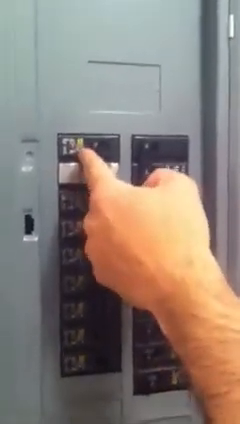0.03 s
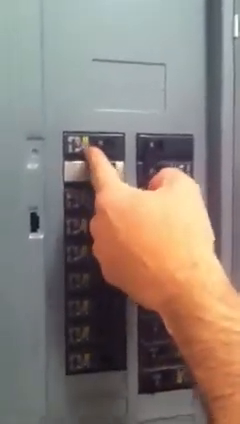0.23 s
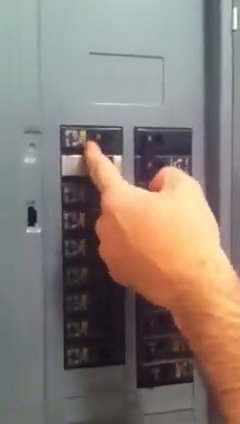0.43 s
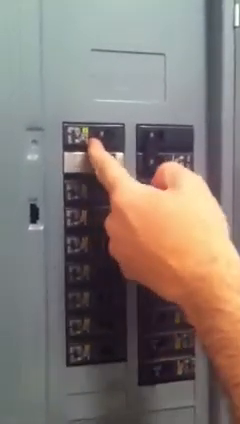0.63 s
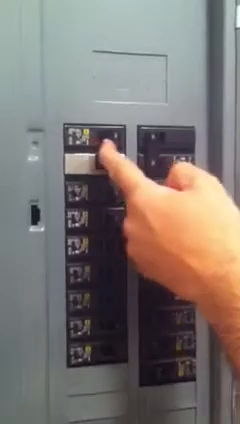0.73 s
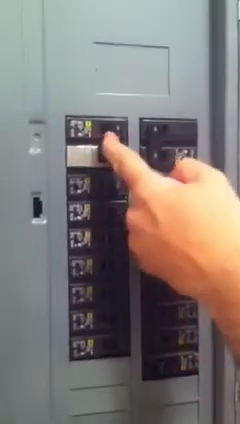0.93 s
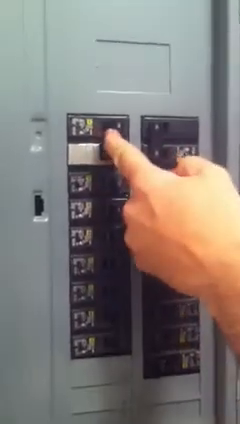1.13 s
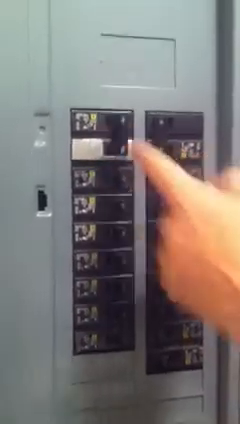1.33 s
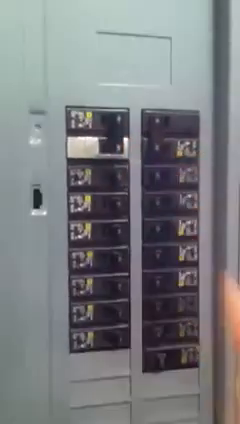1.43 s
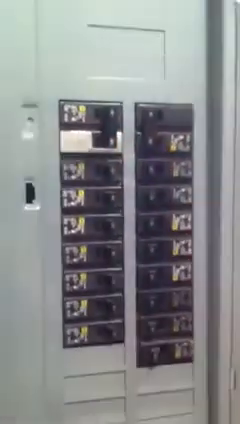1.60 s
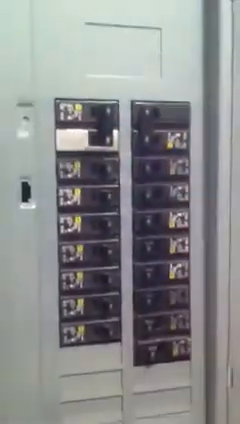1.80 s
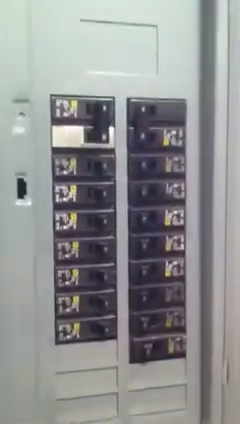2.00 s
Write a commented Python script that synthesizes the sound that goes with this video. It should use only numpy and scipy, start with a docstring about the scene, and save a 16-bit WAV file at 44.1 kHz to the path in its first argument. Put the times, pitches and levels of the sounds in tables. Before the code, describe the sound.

A circuit breaker snaps back on, close up in a small hard room. The plastic handle ticks faintly around 0.6 seconds, then one loud, bright snap at 0.8 seconds rings the steel cabinet with a short boom and echo, fading within half a second. The finger releases with a soft tick and bump at 1.3 seconds, and the arm rustles faintly away until 2 seconds. A faint low hum runs throughout.

```python
"""In a small hard room, close to a steel home panel, a tripped circuit breaker is pushed back on.
The handle ticks under the finger, then a spring throws the contacts shut. Their few impacts within
10 ms are heard as one snap that rings the mechanism, booms the cabinet and echoes in the room.
The finger lets go with a tick and the arm rustles away. A low hum runs throughout."""
import sys
import numpy as np
from scipy import signal
from scipy.fft import rfft, irfft, next_fast_len
from scipy.io import wavfile
from scipy.ndimage import map_coordinates

SR = 44100
rng = np.random.default_rng(int(sys.argv[2]) if len(sys.argv) > 2 else 0)


def generate_wav(signal):
    """Clip the signal to [-1, 1] and save it as 16-bit WAV at the path in sys.argv[1]."""
    frames = np.transpose(np.atleast_2d(signal))
    scaled = np.clip(frames, -1, 1) * 32767
    pcm = np.round(scaled).astype(np.int16)
    wavfile.write(sys.argv[1], SR, pcm)


N = 90493
T = np.arange(N) / SR
SHARP_RISE_S = .0003
ECHO_START_S, ECHO_RISE_S, SWELL_S = .774, .0032, .0091


def amp(db):
    """Turn decibels into a gain."""
    return 10 ** (np.asarray(db) / 20)


def unit(x):
    """Scale a sound to an average (rms) level of 1."""
    return x / np.sqrt(np.mean(x ** 2) + 1e-20)


def along(points, hz):
    """Read between a table's rows on a log pitch scale."""
    pitches, values = np.transpose(points)
    return np.interp(np.log(hz + 1), np.log(pitches + 1), values)


def filtered(x, response):
    """Turn each frequency up or down by response(hz)."""
    size = next_fast_len(N + SR // 2)
    return irfft(rfft(x, size) * response(np.fft.rfftfreq(size, 1 / SR)), size)[:N]


def noise(colour):
    """Noise shaped by a table of pitches and relative levels."""
    return unit(filtered(rng.standard_normal(N), lambda hz: amp(along(colour, hz))))


def band(centre_hz, octaves):
    """Noise that is strongest around one pitch."""
    white = rng.standard_normal(N)
    return unit(filtered(white, lambda hz: np.exp(-.5 * (np.log2((hz + 1) / centre_hz) / octaves) ** 2)))


def strike(start_s, rise_s, fade_s):
    """A loudness curve that rises, then dies away. Every fade_s is the time to drop 60 dB."""
    age = np.maximum(T - start_s, 0)
    return (1 - np.exp(-age / rise_s)) * amp(-60 * age / fade_s)


def ring(tones, start_s, rise_s):
    """The fading tones of a struck object, each at a slightly random level."""
    return sum(amp(db + rng.normal()) * strike(start_s, rise_s, fade_s)
               * np.sin(2 * np.pi * (hz * T + rng.random())) for hz, db, fade_s in tones)


def wobble(rate):
    """A smooth random curve through rate points a second."""
    return map_coordinates(rng.standard_normal(256), [T * rate], mode="wrap")


# Tone of the room's air: pitch_hz, level_db
AIR_COLOUR = [(15, -68), (25, -39.5), (86, -28.5), (101, -19.5), (140, -7.5), (173, -6.5), (188, -5),
              (227, 3.5), (267, -11), (368, -6.5), (410, -17), (567, -16), (722, -17.5), (1170, -24),
              (1300, -18.5), (1900, -25), (15500, -31)]
def room_air():
    """A steady low rush with a faint hiss."""
    return amp(-63.5) * noise(AIR_COLOUR)


# Tones of the hum: pitch_hz, level_db
HUM_TONES = [(120, -80.5), (150.7, -76.5), (200, -68.5), (231, -69.5), (381, -76.5)]
def hum():
    """Low tones that waver in loudness and pitch."""
    tones = 0
    for hz, db in HUM_TONES:
        waver = 1 + .45 * (wobble(rate=11) + 1j * wobble(rate=5.9))
        tones += amp(db) * np.real(waver * np.exp(2j * np.pi * (hz * T + rng.random())))
    return tones


# Loudness of the rustle: time_s, level_db
RUSTLE_LEVELS = [(0, -72), (.12, -68), (.36, -68), (.5, -71), (.75, -71), (1.1, -83), (1.27, -80),
                 (1.4, -74), (1.62, -69.5), (1.76, -84), (1.93, -69), (2.05, -78)]
# Tone of the rustle: pitch_hz, level_db
RUSTLE_TONE = [(100, -7), (400, 7.5), (1400, 0.5), (2600, -4.5), (6000, -8.5), (15000, -13)]
def arm_rustle():
    """The arm rustles faintly as it moves."""
    return amp(np.interp(T, *np.transpose(RUSTLE_LEVELS))) * noise(RUSTLE_TONE)


# Loudness of the brushing: time_s, level_db
BRUSH_LEVELS = [(1.75, -94), (1.86, -73.5), (1.94, -74), (2.05, -80.5)]
def arm_brush():
    """A light, high brushing as the arm draws back."""
    return amp(np.interp(T, *np.transpose(BRUSH_LEVELS))) * band(centre_hz=5500, octaves=.8)


# Soft bumps: start_s, level_db, pitch_hz, width_octaves, fade_s
HAND_BUMPS = [(1.315, -57, 219, 0.93, 0.45), (1.314, -59.5, 690, 0.88, 0.19), (1.833, -58, 900, 1.12, 0.2)]
def hand_bumps():
    """The hand bumps softly as it leaves."""
    return sum(amp(db) * band(hz, octaves) * strike(start_s, rise_s=.011, fade_s=fade_s)
               for start_s, db, hz, octaves, fade_s in HAND_BUMPS)


# How long the room holds each pitch: pitch_hz, fade_s
ROOM_FADES = [(150, .4), (600, .32), (2000, 0.22), (5000, .27), (9000, 0.24), (14000, 0.14)]
def room_fade(x, start_s):
    """From start_s on, each pitch dies away at the room's own speed."""
    hz, times, spectrum = signal.stft(x, SR, nperseg=256)
    fade = amp(-60 * np.maximum(times - start_s, 0) / along(ROOM_FADES, hz)[:, None])
    return signal.istft(spectrum * fade, SR, nperseg=256)[1][:N]


# Tone of the room's echo: pitch_hz, level_db
ECHO_COLOUR = [(25, -27), (55, -15), (90, -18.5), (150, 1), (300, 3), (600, 0), (1200, 0.5), (2500, 0.5),
               (4000, -1), (5600, 4), (7000, -0.5), (9500, 3), (12500, 3.5), (13500, 3), (15500, -3.5)]
def room_echo():
    """The room answers the snap with a wash of sound whose bass builds more slowly."""
    tail = amp(-19) * room_fade(noise(ECHO_COLOUR), ECHO_START_S)
    bass = filtered(tail, lambda hz: 1 / (1 + (hz / 410) ** 2))  # below about 410 Hz
    treble = (tail - bass) * strike(ECHO_START_S, ECHO_RISE_S, np.inf)
    return treble + bass * strike(ECHO_START_S, SWELL_S, np.inf)


# Tone of the shimmer: pitch_hz, level_db
SHIMMER_COLOUR = [(100, -20.5), (600, -5.5), (1500, 0), (3200, 3), (5800, -1), (9000, -6.5), (14000, -18)]
def steel_shimmer():
    """The steel shimmers faintly after the snap."""
    return amp(-44.5) * noise(SHIMMER_COLOUR) * strike(ECHO_START_S, SWELL_S, fade_s=.64)


# Small ticks: start_s, level_db, pitch_hz, width_octaves, fade_s
HANDLE_TICKS = [(0.636, -60, 8000, .6, .03), (0.6652, -55, 8200, .4, .04), (0.744, -60, 5000, 1.1, .06),
                (1.3093, -52, 5400, .7, .035)]
def handle():
    """The plastic handle ticks as it is pushed and let go, and the room echoes it."""
    ticks = sum(amp(db) * band(hz, octaves) * strike(start_s, SHARP_RISE_S, fade_s)
                for start_s, db, hz, octaves, fade_s in HANDLE_TICKS)
    tail = room_fade(rng.standard_normal(N), 0)
    return ticks + amp(-4) * signal.fftconvolve(ticks, tail / np.linalg.norm(tail))[:N]


# Low tones of the cabinet: pitch_hz, level_db, fade_s
CABINET_TONES = [(176.2, -38.5, 0.53), (233, -26, .19), (259.7, -34, .34), (314.4, -39.5, .25),
                 (365, -43.5, 0.34), (464.7, -44, 0.15), (498.47, -41.5, 0.2), (556, -44.5, .42),
                 (617.4, -39.5, 0.37), (721, -36.5, .2), (820, -39.5, .25), (1017, -41, .2),
                 (1122, -29.5, 0.1), (1160, -41.5, 0.35), (1466, -42.5, 0.37)]
def cabinet():
    """The sheet-steel cabinet swells into a boom just after the impacts."""
    return amp(-1) * ring(CABINET_TONES, start_s=.782, rise_s=.0098)


# High tones of the mechanism: pitch_hz, level_db, fade_s
MECHANISM_TONES = [(1845, -34.5, 0.26), (1864, -21.5, 0.047), (3290, -34.5, .23), (3664, -33, .1),
                   (4046, -28.5, .14), (4220, -29, .1), (4550, -29, .14), (5145, -34, .15),
                   (5730, -33, .26), (5703, -20.5, .1), (5929, -32, 0.054), (6094, -32, .15),
                   (7624, -23, .12), (7613, -24, .1), (9556, -30, .17), (11440, -28, .11), (12500, -24, .1),
                   (12679, -24, .1)]
def mechanism():
    """The spring, contact arm and case ring at once when struck."""
    return amp(-1) * ring(MECHANISM_TONES, start_s=.773, rise_s=SHARP_RISE_S)


# Tone of an impact: pitch_hz, level_db
IMPACT_COLOUR = [(100, -26), (500, -22.5), (1200, -13.5), (2600, -8.5), (4000, -1), (5500, 2.5), (7000, -3),
                 (10000, -3.5), (12400, -2.5), (13600, -8.5), (15500, -8.5)]
def impact_noise():
    """The bright noise of an impact."""
    return noise(IMPACT_COLOUR)


def first_echoes():
    """Closely packed echoes follow the impacts."""
    return amp(-23.5) * impact_noise() * strike(ECHO_START_S, ECHO_RISE_S, fade_s=.14)


# Impacts inside the snap: start_s, level_db
IMPACTS = [(0.7683, -27), (0.7707, -6.5), (0.7739, -12), (0.7747, -7.5), (0.7781, -11.5)]
def contacts():
    """The contacts slam shut in a few quick cracks."""
    power = sum((amp(db) * strike(start_s, SHARP_RISE_S, fade_s=.01)) ** 2 for start_s, db in IMPACTS)
    return impact_noise() * np.sqrt(power)


def scene():
    """Add all the sounds into one channel."""
    snap = contacts() + mechanism() + cabinet()
    tail = first_echoes() + room_echo() + steel_shimmer()
    movement = handle() + hand_bumps() + arm_brush() + arm_rustle()
    return (snap + tail + movement + hum() + room_air())[None]


def record(dry):
    """Round off the loudest peaks and cut the highest treble."""
    ceiling, top_hz = .7, 15900
    rounded = dry / (1 + (dry / ceiling) ** 6) ** (1 / 6)
    return signal.sosfilt(signal.ellip(10, .1, 70, top_hz, fs=SR, output="sos"), rounded)


dry = scene()
out = record(dry)
generate_wav(out)
```